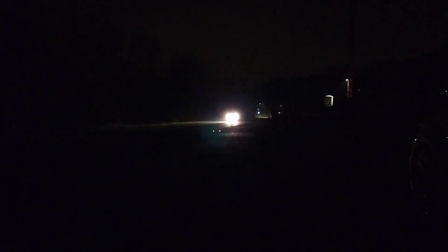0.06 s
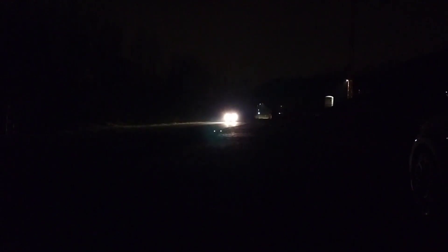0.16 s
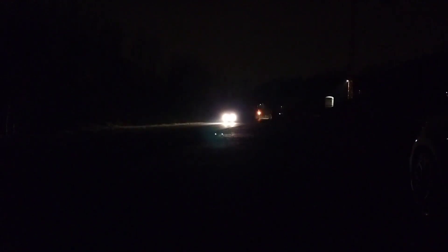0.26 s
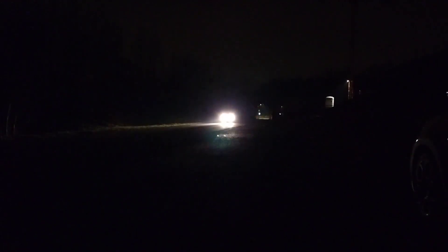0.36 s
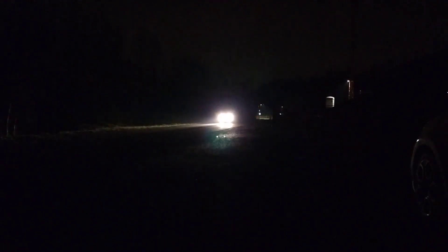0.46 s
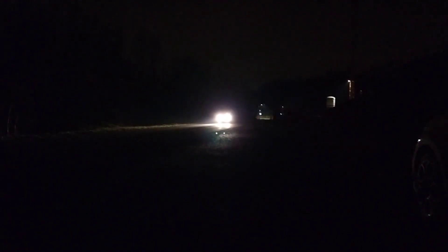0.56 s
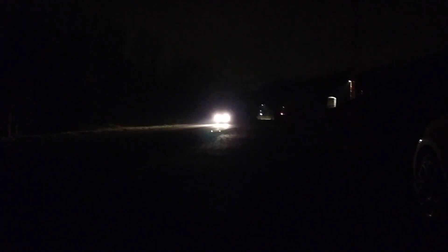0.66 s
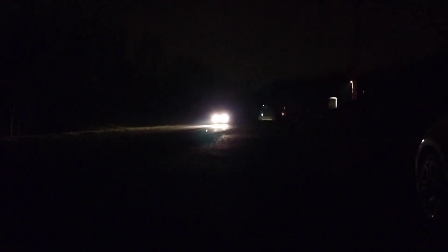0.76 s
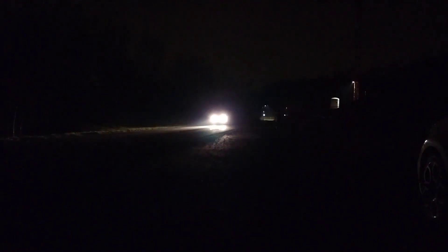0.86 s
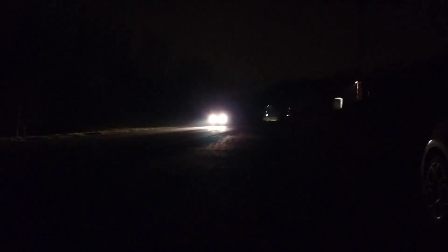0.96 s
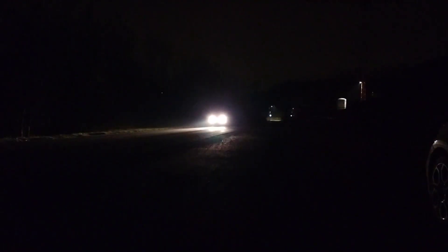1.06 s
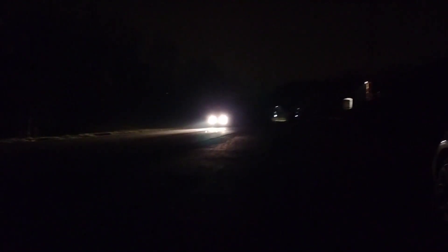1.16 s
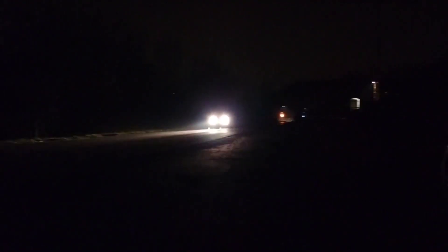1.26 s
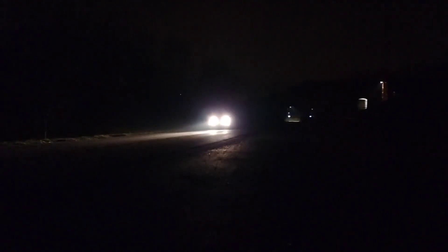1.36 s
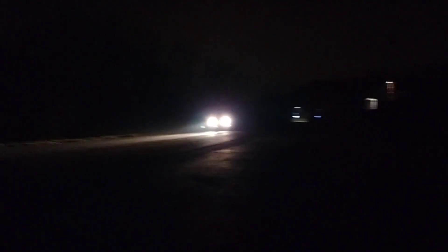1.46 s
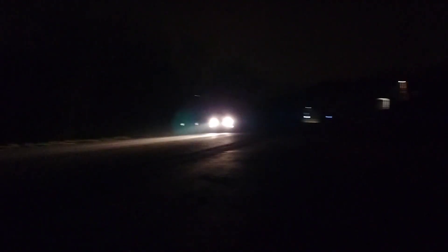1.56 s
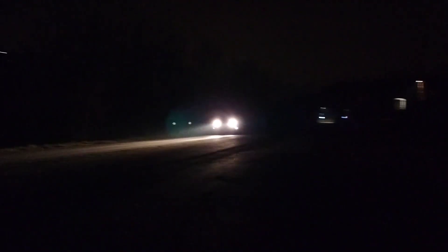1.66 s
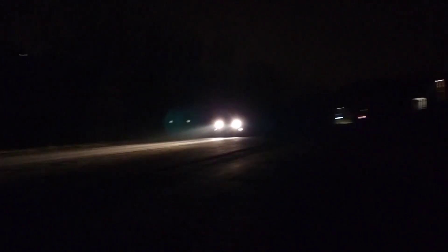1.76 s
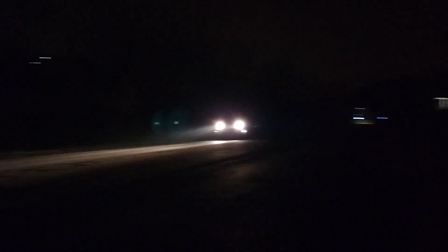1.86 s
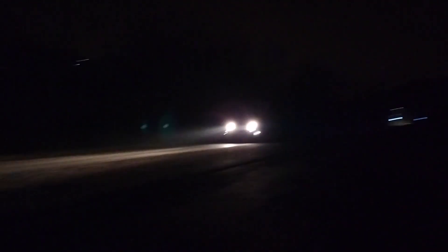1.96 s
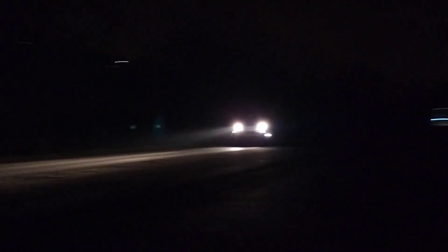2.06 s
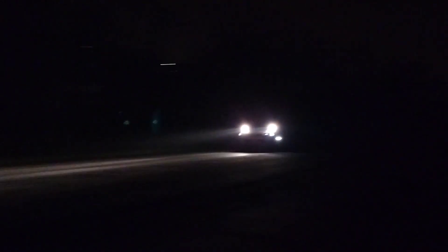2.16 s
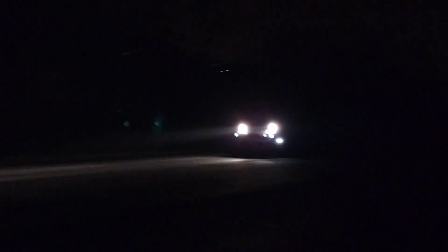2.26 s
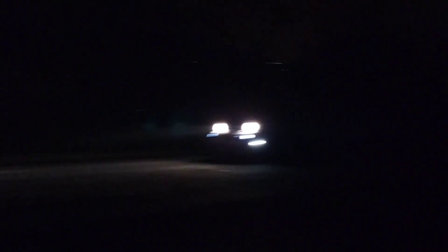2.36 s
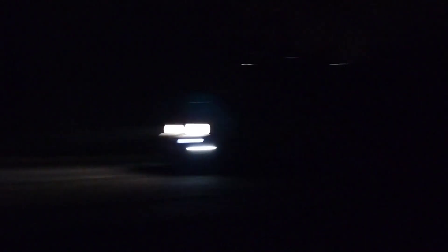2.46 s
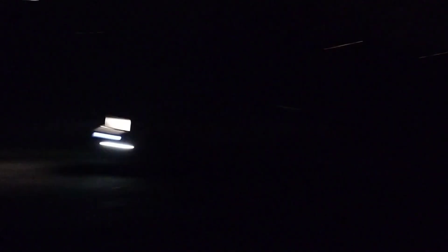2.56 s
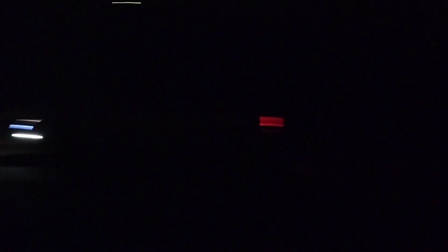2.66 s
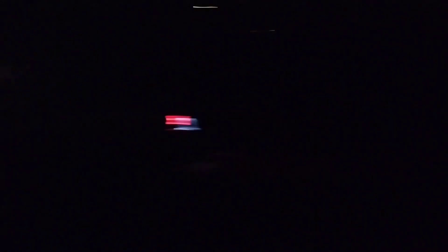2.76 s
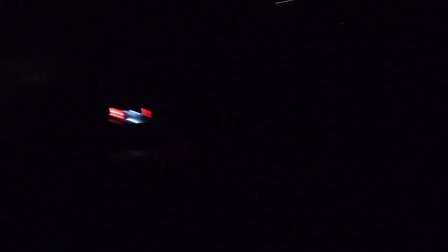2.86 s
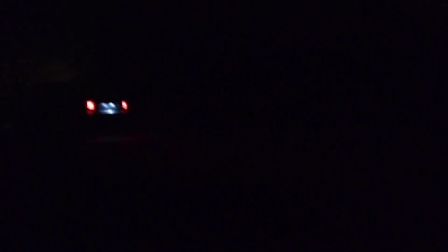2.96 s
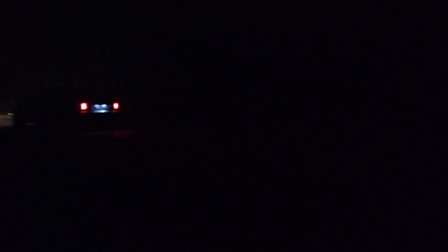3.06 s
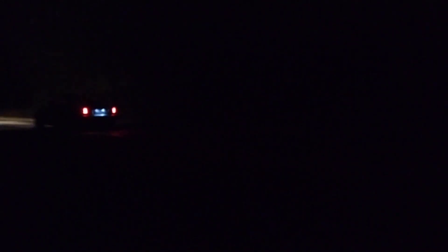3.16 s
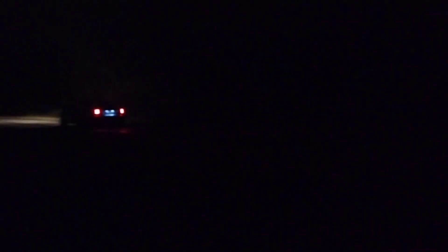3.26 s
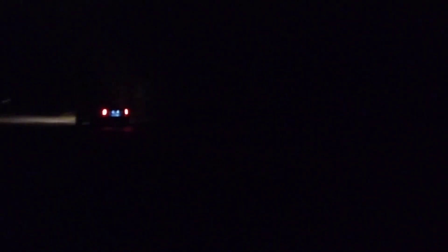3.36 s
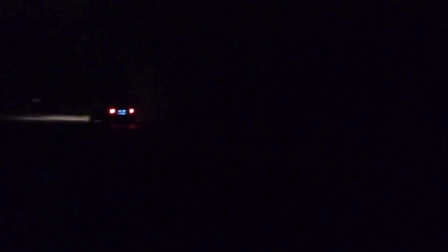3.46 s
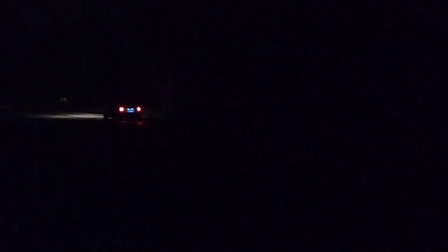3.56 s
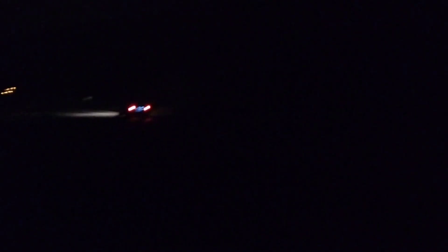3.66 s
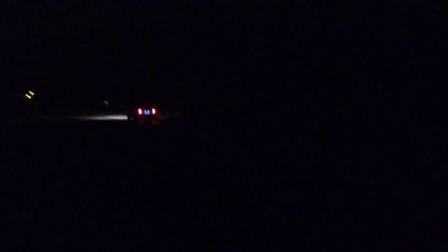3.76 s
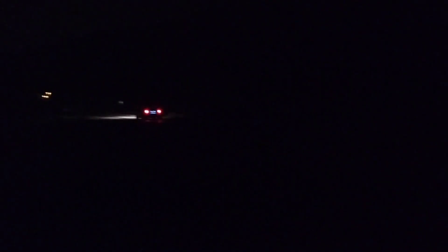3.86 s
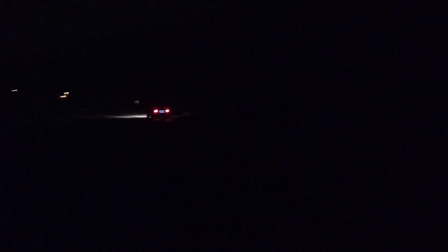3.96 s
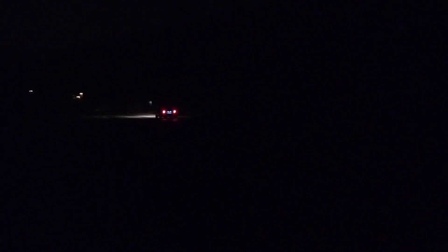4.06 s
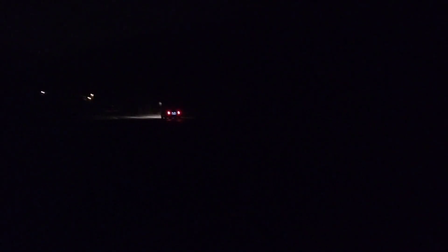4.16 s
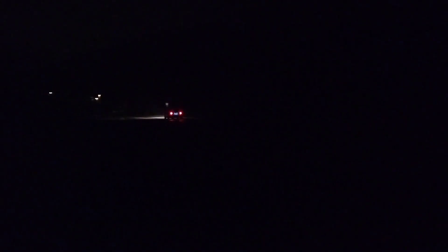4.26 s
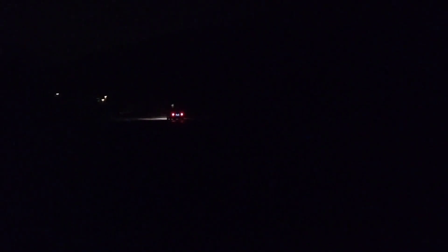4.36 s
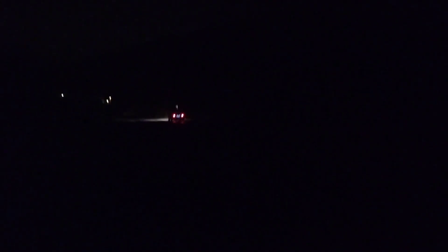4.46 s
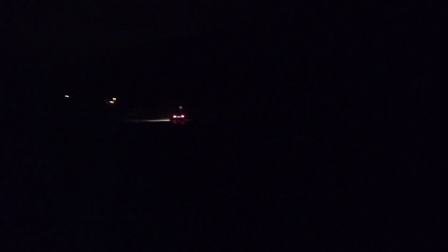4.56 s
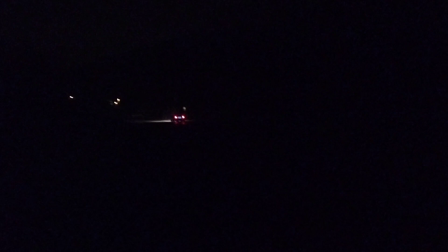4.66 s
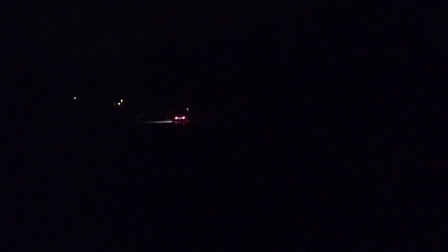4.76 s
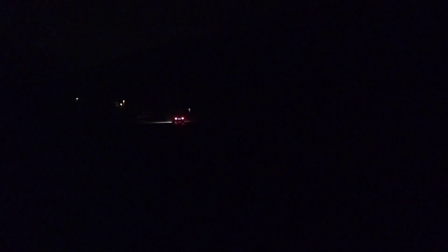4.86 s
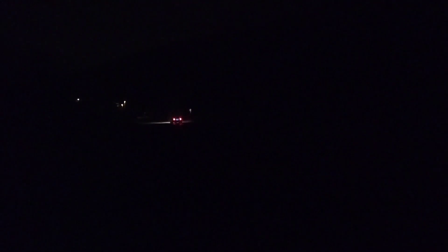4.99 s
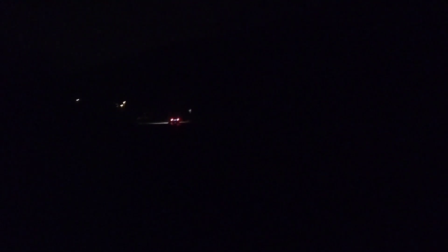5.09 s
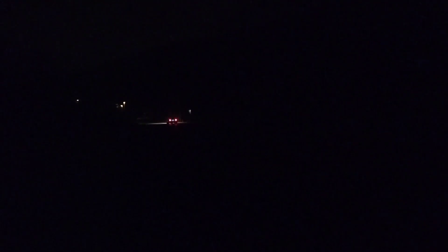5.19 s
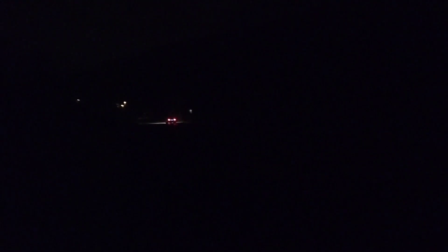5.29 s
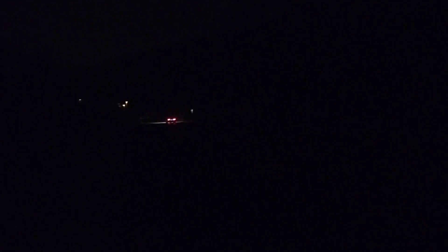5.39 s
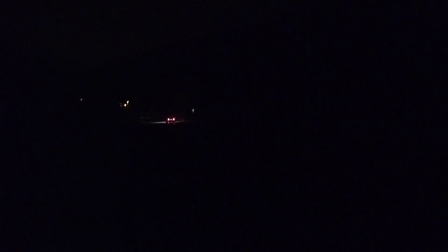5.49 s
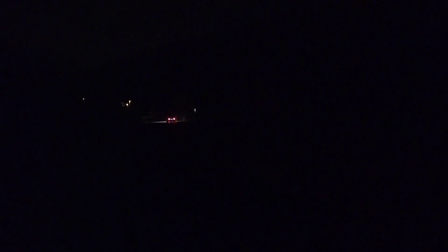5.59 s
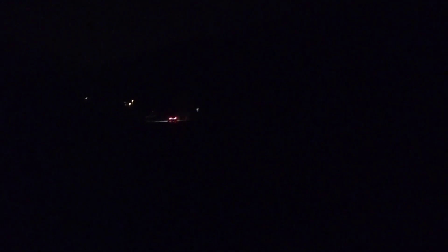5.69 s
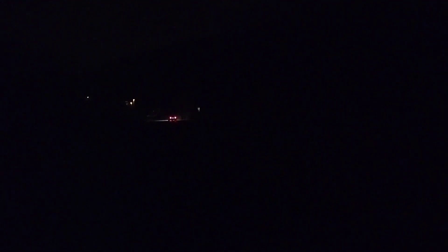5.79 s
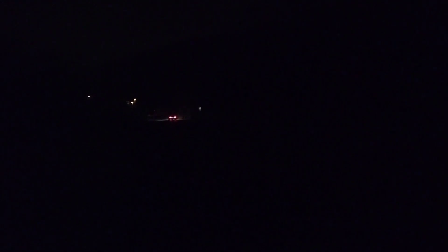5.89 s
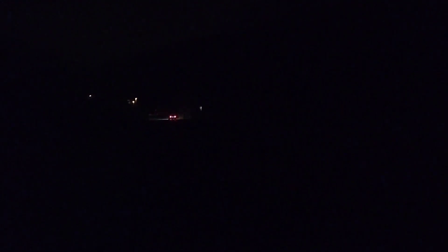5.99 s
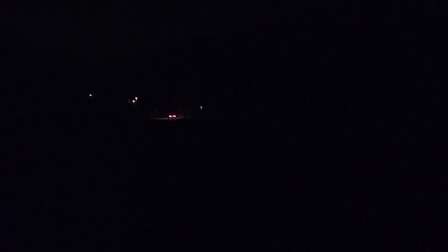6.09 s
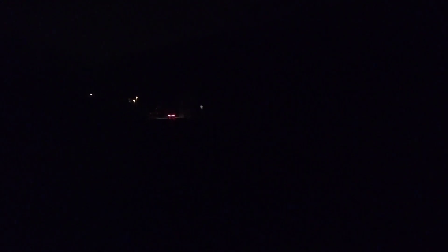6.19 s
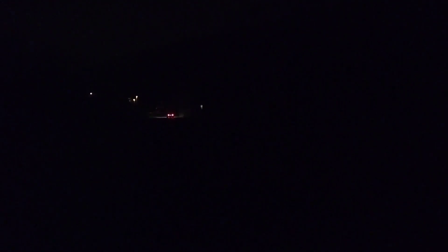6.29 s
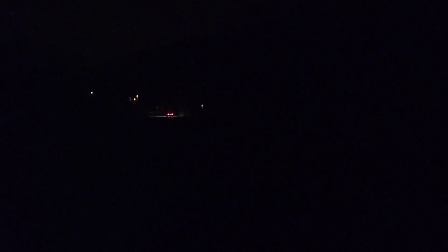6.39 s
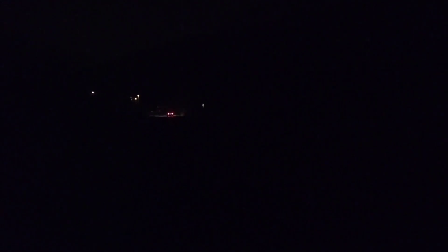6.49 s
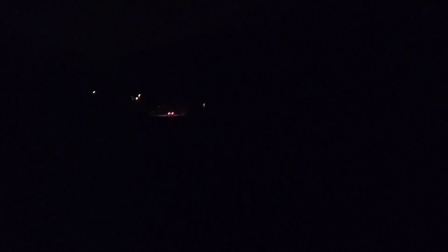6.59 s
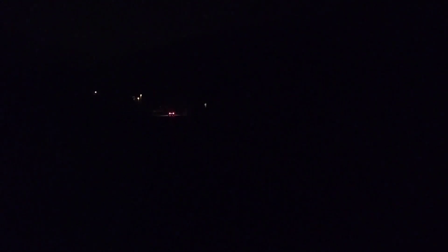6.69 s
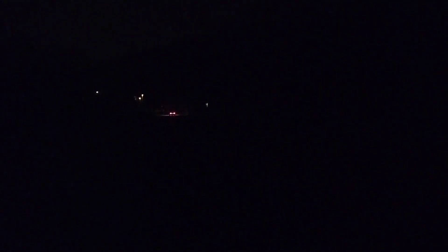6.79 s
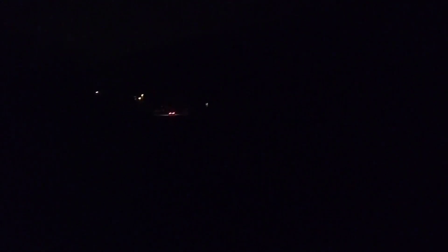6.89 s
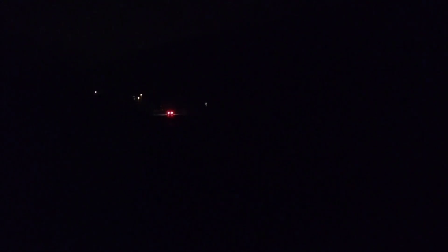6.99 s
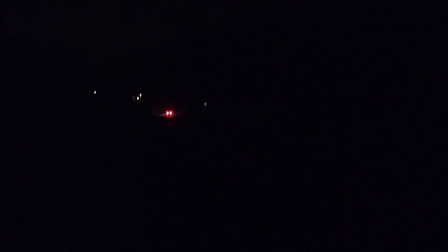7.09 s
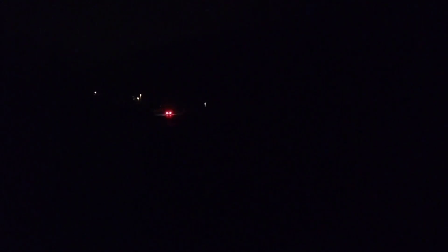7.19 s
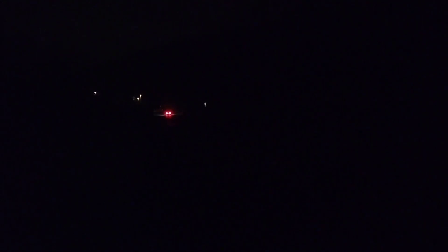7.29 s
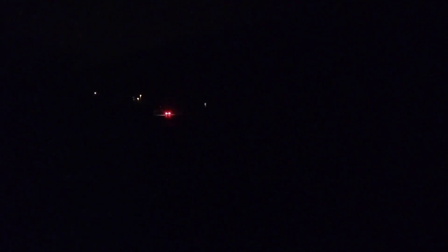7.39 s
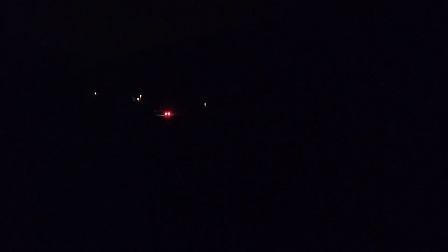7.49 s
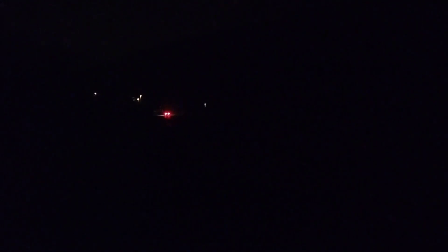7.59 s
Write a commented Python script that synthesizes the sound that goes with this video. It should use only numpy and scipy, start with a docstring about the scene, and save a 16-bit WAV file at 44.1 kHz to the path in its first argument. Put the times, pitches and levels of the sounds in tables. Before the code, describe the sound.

A still night road heard from the verge in the open air. From 0 to 0.5 s a distant four-cylinder engine wavers on and off the throttle, then flares and pulls. Until 2.5 s it approaches as a low, hollow boom around 150-170 Hz, beating slowly against a lower echo from houses behind it, while tyre roar and rushing air swell. At about 2.8 s it passes very close: a loud broadband whoosh, crisp tread hiss, and the pitch slides down. From 2.9 to 3.4 s the tailpipe spits hard, raspy and barking. Revs rise until 3.8 s, the throttle eases, and a tight double pop hits at 4.07 s as the revs fall into the next gear by 4.4 s, with a small shudder. It then pulls away on a steady hollow drone, rasp and bark dulling. Near 6.9 s the driver lifts; a faint rough burble fades out by 7.6 s.

```python
"""A four-cylinder sports car with a loud exhaust speeds up on a night road, passes close by, changes up and drives off.
Coming on, it is a low boom in a rush of tyres and air, beating against its own lower echo from the houses behind it.
Once past, the tailpipe barks and rasps; it pops as the next gear bites and burbles when the driver lifts far away.
Trains of firing pulses through filters make the engine, its echo and its pops, with a sinusoid for most of the boom;
gated noise makes the spray of gas, and coloured noise the road and the night."""
import sys
import numpy as np
from scipy import signal
from scipy.fft import rfft, irfft, next_fast_len
from scipy.io import wavfile
from scipy.ndimage import uniform_filter1d, map_coordinates

SR = 44100
rng = np.random.default_rng(int(sys.argv[2]) if len(sys.argv) > 2 else 0)


def digitize_waveform(pressure):
    """Quantize a signal to 16-bit integers and store it at the path in sys.argv[1].

    Rows of a 2-D input are taken as channels; values are limited to [-1, 1].
    """
    field = np.atleast_2d(pressure).T
    bounded = np.clip(field, -1, 1)
    quanta = np.round(bounded * 32767).astype(np.int16)
    wavfile.write(sys.argv[1], SR, quanta)


N = 336924  # length of the scene in samples


def amp(db):
    """Level law: decibels to amplitude gain."""
    return 10 ** (np.asarray(db) / 20)


def unit(x):
    """Normalisation: x at rms 1."""
    return x / np.sqrt(np.mean(x ** 2) + 1e-20)


def steady(x, size=2200):
    """Envelope flattening: x held at a running rms of 1 over windows of size samples."""
    power = uniform_filter1d(uniform_filter1d(x ** 2, size), size)
    return x / np.sqrt(np.abs(power) + 1e-16)


def curves(rows):
    """Linear interpolation: one value per sample for each column after the time."""
    s, *cols = np.transpose(rows)
    return [np.interp(np.arange(N) / SR, s, c) for c in cols]


def wobble(rate):
    """Slow random modulation: a smooth curve through rate random knots a second."""
    knots = rng.standard_normal(int(N * rate / SR) + 4)
    return map_coordinates(knots, [np.arange(N) * rate / SR])


def coloured(x, points, size=8192):
    """Minimum-phase filtering: x through a causal filter with the gain of the (Hz, dB) points."""
    hz, db = np.transpose(points)
    gain = amp(np.interp(np.log(np.fft.rfftfreq(size, 1 / SR) + 1), np.log(hz), db))
    # folding the cepstrum onto positive time makes the response causal
    cepstrum = irfft(np.log(gain))
    cepstrum[1:size // 2] *= 2
    cepstrum[size // 2 + 1:] = 0
    response = irfft(np.exp(rfft(cepstrum)))
    return signal.oaconvolve(x, response)[:N]


def band(x, lo_hz, hi_hz, order=16):
    """Zero-phase band-pass: the part of x between two edges, steeper with order."""
    m = next_fast_len(N + 8192, True)
    hz = np.fft.rfftfreq(m, 1 / SR) + 1
    spectrum = rfft(x, m) / (1 + (lo_hz / hz) ** order) / (1 + (hz / hi_hz) ** order)
    return irfft(spectrum, m)[:N]


def noise(points):
    """Spectral shaping: random noise of rms 1 with the given colour."""
    return unit(coloured(rng.standard_normal(N), points))


def impulses(at, sizes):
    """Windowed-sinc interpolation: band-limited clicks at fractional sample positions."""
    taps = np.floor(at).astype(int)[:, None] + np.arange(-7, 9)
    away = taps - at[:, None]
    shape = np.sinc(away) * np.cos(np.pi * away / 16) ** 2
    return np.bincount(np.clip(taps, 0, N).ravel(), (sizes[:, None] * shape).ravel(), N + 1)[:N]


PASS_S = 2.83  # moment when the car is abreast (s)
ABREAST_S = .239  # time to travel the closest distance (s)


def since_pass():
    """Kinematics of the pass: seconds since the car was abreast, negative while it comes on."""
    return np.arange(N) / SR - PASS_S


def doppler(mach=.08):
    """Doppler effect: pitch heard over pitch made, for a car at mach times the speed of sound."""
    t = since_pass()
    return 1 / (1 + mach * t / np.hypot(t, ABREAST_S))


def swell_db(lead_s, width_s, spread_db, loss_db_per_s):
    """Spreading of a sound beamed ahead: spread_db lost per tenfold distance, and more to air and ground."""
    t = since_pass() + lead_s
    return -spread_db * np.log10(np.hypot(t, width_s) / width_s) - loss_db_per_s * np.abs(t)


def scattered_share(most=0.69, coming_s=0.93, going_s=2.1):
    """Loss of coherence: the share arriving by detours grows with distance, more slowly while the pipe points
    away."""
    t = since_pass()
    return most * (1 - np.exp(-(t / np.where(t < 0, coming_s, going_s)) ** 2))


# Moves of the pedal, each held until the next; the first row is the starting state. Each row: middle of the
# move in seconds, time taken in seconds, throttle 0-1, roughness of the burn (held to 0-1), weakness of
# every second firing 0-1.
PEDAL_MOVES = [(0, .01, 0.53, 0.04, .05), (0.118, 0.04, .15, 0.16, .05), (.238, 0.028, 0.72, 0.4, .03),
               (.37, 0.019, 0.27, 0.4, 0), (0.407, .02, 0.85, .2, 0), (0.489, 0.044, 0.94, 0.15, 0.08),
               (3.817, .025, 0.51, 0.6, .3), (4.07, .008, 0.98, 0.09, 0), (6.92, 0.086, 0.19, 0.51, 0.3),
               (7.06, 0.06, 0.45, 1.17, 0.4), (7.222, 0.017, .35, 0.25, .75)]


def pedal():
    """Smooth step response: throttle, roughness and weakness per sample."""
    t = np.arange(N) / SR
    state = np.outer(PEDAL_MOVES[0][2:], np.ones(N))
    for before, (s, taken, *after) in zip(PEDAL_MOVES, PEDAL_MOVES[1:]):
        step = (1 + np.tanh(2 * (t - s) / taken)) / 2
        state += np.outer(np.subtract(after, before[2:]), step)
    return np.clip(state, 0, 1)


# Unequal exhaust pipes in firing order. Each row: lateness in firing periods, level in dB.
UNEQUAL_PIPES = [(0.0013, 0.52), (0.033, -0.3), (0.024, -0.1), (0.035, 0.14)]


def firings(turns, rough, weak, jitter, scatter_db=2.0):
    """Near-periodic excitation: unequal pipes make some pulses late, and rough burning scatters them."""
    k = np.arange(1, int(turns[-1]))
    late, db = np.array(UNEQUAL_PIPES)[k % len(UNEQUAL_PIPES)].T
    rough, weak = np.interp(k, turns, rough), np.interp(k, turns, weak)
    moment = k + late + jitter * rough * rng.standard_normal(len(k))
    at = np.interp(moment, turns, np.arange(N))  # sample positions
    sizes = amp(db + scatter_db * rough * rng.standard_normal(len(k))) * (1 - weak * (k % 2))
    return at, sizes


# Colour of the night. Each row: frequency in Hz, relative gain in dB.
NIGHT_COLOUR = [(25, -20.5), (100, 6), (400, -1), (1500, -10), (2600, -22.5), (3800, -18), (5000, -41),
                (8000, -45), (16000, -51)]


def night(level_db=-55.5):
    """Stationary background: faint coloured noise for the still night."""
    return amp(level_db) * noise(NIGHT_COLOUR)


# The houses hear the car going away, so their echo is lower.
# Each row: time in seconds, firing rate heard in Hz, level in dB.
ECHO_COURSE = [(.35, 150.5, -54), (.7, 152, -36.5), (1.2, 152.3, -36), (1.7, 154.7, -32), (2.2, 154.6, -33),
               (2.9, 152.1, -74.5)]
# Colour of the echo. Each row: frequency in Hz, relative gain in dB.
HOUSES_COLOUR = [(100, 0.5), (153, 7.5), (305, 2), (460, -5.5), (615, 0.5), (800, -24), (1100, -17),
                 (2500, -35.5), (5000, -64.5)]


def house_echo(rough, weak):
    """Reflection with its own Doppler shift: the engine note thrown back from behind the oncoming car."""
    hz, db = curves(ECHO_COURSE)
    at, sizes = firings(np.cumsum(hz) / SR, rough, weak, jitter=0.025)
    return amp(db + 1.2 * wobble(7)) * steady(coloured(impulses(at, sizes), HOUSES_COLOUR))


def patchy(x, depth_db=2.3, size=512):
    """Time-varying spectrum: brief swells a few hundred hertz wide, as the surface under the tyres changes."""
    z = signal.stft(x, nperseg=size)[2]
    field = uniform_filter1d(rng.standard_normal(z.shape), size=3, axis=0)
    field = uniform_filter1d(uniform_filter1d(field, size=10, axis=1), size=5, axis=1)
    return unit(signal.istft(z * amp(depth_db * unit(field)), nperseg=size)[1][:N])


# Colours of the tyre roar and of the fine tread hiss. Each row: frequency in Hz, relative gain in dB.
ROAR_COLOUR = [(25, -39.5), (55, -19), (85, -13.5), (200, -4.5), (380, -3), (480, -0.5), (780, -4),
               (1080, -1), (1750, -3), (2600, -10.5), (3050, -19), (3900, -11), (4800, -27.5),
               (5650, -20.5), (6500, -42), (7300, -34), (9600, -50), (12000, -51), (13000, -58),
               (16000, -63.5)]
TREAD_COLOUR = [(1500, -21.5), (3000, -16), (4000, -0.5), (4700, -15), (5800, -6.5), (7200, -16),
                (9700, -28.5), (11000, -33.5), (12000, -24), (13000, -42), (14800, -36.5), (16000, -46)]


def road(throttle, rush_db=-18.5, spray_db=-33, absorption=0.17, behind_db=-3, shut_db=-9.5):
    """Air absorption: tyres and drawn air roar, duller as they fade; tread hiss carries only a few metres."""
    fade_db = swell_db(lead_s=0.63, width_s=0.25, spread_db=17.5, loss_db_per_s=4.0)
    fade_db = fade_db + behind_db * (1 + np.tanh(since_pass() / ABREAST_S)) / 2
    roar = patchy(noise(ROAR_COLOUR))
    low = band(roar, 20, 4600)
    roar = low + amp(absorption * fade_db) * (roar - low)
    hiss_db = spray_db + swell_db(lead_s=0.18, width_s=0.31, spread_db=32, loss_db_per_s=7)
    hiss = amp(hiss_db) * noise(TREAD_COLOUR)
    roar_db = rush_db + fade_db + shut_db * (1 - throttle) + 0.34 * wobble(25)
    return amp(roar_db) * roar + hiss


def roadside(x, t60=0.21, abreast_db=-17, scattered_db=-10.5):
    """Diffuse reverberation: hedges and verges scatter a short dull tail, stronger as the car is farther off."""
    # scattered_db is the limit for a wholly scattered sound
    wet = amp(abreast_db + (scattered_db - abreast_db) * np.sqrt(scattered_share()))
    t = np.arange(SR // 2) / SR
    tail = rng.standard_normal(len(t)) * amp(-60 * t / t60) * (1 - np.exp(-t / 0.0095))
    return band(signal.oaconvolve(wet * x, tail / np.linalg.norm(tail))[:N], 430, 4300, order=2)


# The engine flares, pulls, drops into the next gear, pulls again and coasts.
# Each row: time in seconds, firing rate at the engine in Hz.
REV_COURSE = [(0, 110), (.22, 110.6), (.48, 157.1), (.6, 147.1), (3.8, 171.4), (4.05, 161), (4.44, 128.3),
              (5.25, 131.2), (6.84, 135), (7.0, 131), (7.64, 131.5)]


def firing_rate(clutch_s=4.43, swing_hz=1.8, shudder_hz=6.8, fade_s=.2):
    """Damped torsional oscillation: firings per second, with a drivetrain shudder when the clutch bites."""
    t = np.maximum(np.arange(N) / SR - clutch_s, 0)
    return curves(REV_COURSE)[0] - swing_hz * np.sin(2 * np.pi * shudder_hz * t) * np.exp(-t / fade_s)


def puffs(at, sizes, life, between):
    """Amplitude-gated turbulence: noise bursts out with each pulse and decays by e in life seconds."""
    t = np.arange(SR // 50) / SR
    gate = signal.oaconvolve(impulses(at, sizes), np.exp(-t / life))[:N]
    return unit((gate + between) * rng.standard_normal(N))


# Which colour is heard. Each row: time in seconds, position (0 front, 1 beside, 2 behind, 3 far).
ASPECT_COURSE = [(0, 0), (1.2, 0.5), (2.1, 1.5), (2.65, 0.85), (2.92, 2), (3.8, 2.4), (4.3, 2.5), (4.75, 3),
                 (5.6, 3)]


def heard_aspect():
    """Source directivity: the side from which the car is heard, per sample."""
    return curves(ASPECT_COURSE)[0]


# The exhaust's colour from each side, and off the throttle. Each row: frequency in Hz, relative gain in dB.
FRONT_COLOUR = [(150, 3), (245, 12), (335, 12), (400, -12), (500, 2), (610, 0.5), (680, -2.5), (760, -21),
                (860, -17), (950, -15.5), (1050, 6), (1250, -11), (1400, 2.5), (1750, -3), (2600, -18.5),
                (4000, -56)]
BESIDE_COLOUR = [(150, -16), (260, 0.5), (340, 3.5), (420, -1.5), (515, -2), (690, -1), (780, -16),
                 (860, -5), (950, -2.5), (1040, 2.5), (1130, 1), (1300, -8), (1600, -8), (2100, -20),
                 (2600, -23), (4000, -49.5)]
BEHIND_COLOUR = [(150, -6), (315, 2.5), (390, -6.5), (495, 7.5), (630, -3), (715, -9.5), (950, -1),
                 (1100, -1.5), (1300, -11.5), (1500, -11), (1750, -18), (2050, -25.5), (2300, -22.5),
                 (2700, -44.5), (4000, -68.5)]
FAR_COLOUR = [(120, -12), (245, -9), (305, -16), (365, -6), (430, -8.5), (495, 2), (550, -7.5), (605, -5.5),
              (700, -28.5), (850, -27), (1060, -17.5), (1300, -25.5), (1480, -22.5), (1850, -36),
              (2100, -30.5), (2500, -53), (4000, -56)]
COAST_COLOUR = [(120, -3), (230, -17.5), (305, 7), (366, -6), (425, -6), (490, -11.5), (650, -33),
                (1400, -23), (2000, -29.5), (2600, -48), (4000, -61)]
# Range over which the hollow coasting colour gives way to the full voice. Columns: lower and upper throttle, 0-1.
LOAD_RANGE = (0.35, 0.77)


def pipe_voice(flow, aspect, throttle):
    """Source and filter: the gas flow takes the pipe's colour, turning with the car, hollow off the throttle."""
    pulling = 0
    for k, side in enumerate([FRONT_COLOUR, BESIDE_COLOUR, BEHIND_COLOUR, FAR_COLOUR]):
        pulling = pulling + np.clip(1 - abs(aspect - k), 0, 1) * coloured(flow, side)
    load = np.interp(throttle, LOAD_RANGE, [0, 1])
    return load * pulling + (1 - load) * coloured(flow, COAST_COLOUR)


# The boom at full throttle while the car comes and goes. Each row: time in seconds, level in dB.
BOOM_LEVEL = [(0, -32.5), (.3, -24.5), (1.25, -24.5), (1.9, -20), (2.3, -20.5), (2.49, -15), (2.6, -19.5),
              (2.7, -18), (2.81, -26.5), (3.35, -28.5), (3.65, -24.5), (3.9, -27.5), (4.01, -21),
              (5.05, -27), (5.55, -26), (6.8, -30), (7.0, -34)]
# Over this range the pistons come to keep the boom up without throttle. Columns: lower and upper firing rate in Hz.
PUMP_RANGE = (128, 167)


def boom(turns, rate, throttle, rough, shut_db=-19, rumble_db=-21, lag=0.29, lope=0.02, stumble_db=2):
    """Fundamental of the firing rate: a sinusoid loping once per crank turn, over a little unsteady gas flow."""
    db = curves(BOOM_LEVEL)[0] + shut_db * (1 - throttle) * np.interp(rate, PUMP_RANGE, [1, 0])
    tone = np.sqrt(2) * np.cos(2 * np.pi * (turns + lag)) * (1 + lope * np.cos(np.pi * turns + np.pi / 4))
    rumble = amp(rumble_db) * unit(band(rng.standard_normal(N), 95, 210, order=6))
    return amp(db + stumble_db * rough * wobble(25)) * (tone + rumble)


SPLIT_HZ = 646  # where the pipe's body ends and its bark begins
# The body at full throttle while the car comes and goes. Each row: time in seconds, level in dB.
BODY_LEVEL = [(0, -24.5), (.45, -29.5), (1, -34), (1.5, -28), (1.9, -24), (2.2, -31), (2.62, -21.5),
              (2.92, -19), (3.06, -25.5), (3.6, -15.5), (4.15, -18), (4.7, -16.5), (6.4, -18),
              (6.87, -22.5)]


def body(pipe, throttle, shut_db=-34):
    """Low pipe resonances: the hollow part of the voice, weaker with the throttle shut."""
    db = curves(BODY_LEVEL)[0] + shut_db * (1 - throttle)
    return amp(db + 0.21 * wobble(22)) * steady(band(pipe, 190, SPLIT_HZ))


def drifting_paths(x, drift=0.00018, rate=7, count=6):
    """Multipath interference: x arrives by several detours whose lengths waver in the moving air."""
    n = np.arange(N)
    detours = rng.uniform(.001, .04, count)  # seconds
    return steady(sum(np.interp(n - SR * (d + drift * wobble(rate)), n, x, left=0) for d in detours), size=3000)


# The bark at full throttle while the car comes and goes. Each row: time in seconds, level in dB.
BARK_LEVEL = [(0, -59), (.43, -53.5), (.53, -39), (2.05, -28.5), (2.37, -19), (2.7, -23), (3.1, -19),
              (3.75, -20), (4.25, -24), (4.55, -26.5), (5.7, -34.5), (5.87, -39), (6.02, -34.5),
              (6.15, -38.5), (6.85, -42), (7.64, -56)]


def bark(pipe, throttle, shut_db=-28.5):
    """Coherence falling with distance: the upper voice, whose short waves lose their regularity."""
    db = curves(BARK_LEVEL)[0] + shut_db * (1 - throttle)
    scattered = scattered_share()
    direct = steady(band(pipe, SPLIT_HZ, 2469))
    mixed = np.sqrt(1 - scattered) * direct + np.sqrt(scattered) * drifting_paths(direct)
    return amp(db + 2.2 * scattered * wobble(17)) * mixed


# The pipe spits harder for a moment. Each row: centre in seconds, half-length in seconds, peak level in dB.
HARD_SPITS = [(2.872, 0.066, -26), (2.959, 0.049, -26), (3.052, .035, -26.5), (3.184, .045, -25),
              (3.35, 0.11, -30.5), (4.236, .15, -41), (7.21, 0.12, -59.5)]


def spit_gain():
    """Gaussian envelopes: short surges of the rasp, each a smooth rise and fall."""
    t = np.arange(N) / SR
    return sum(amp(db) * np.exp(-2 * ((t - s) / length) ** 2) for s, length, db in HARD_SPITS)


# The rasp at full throttle, without the spits. Each row: time in seconds, level in dB.
RASP_LEVEL = [(0, -59), (1.5, -44), (2.05, -47), (2.8, -32), (3.1, -31.5), (3.7, -37.5), (4.45, -48),
              (5.3, -50), (6.85, -56.5), (7.64, -67.5)]
# Colours of the rasp close by and far off. Each row: frequency in Hz, relative gain in dB.
NEAR_COLOUR = [(1800, -31), (2700, -14), (3200, -4.5), (3900, 5.5), (4800, -11.5), (5800, -13.5),
               (7200, -13.5), (8200, -39), (10000, -44.5), (12000, -39), (13000, -57.5), (16000, -49)]
FAR_RASP_COLOUR = [(1800, -26), (2600, 0.5), (3200, 8.5), (3800, 4.5), (4300, -4.5), (5000, -43.5),
                   (6000, -25.5), (7000, -28.5), (7800, -52.5), (16000, -66)]


def rasp(at, sizes, aspect, throttle, shut_db=-13, scatter_db=1.0, trim_db=-0.5, surge_db=1.2):
    """Jet noise: steep pulse fronts tear spits of noise off the pipe's mouth; distance dulls and smears them."""
    db = curves(RASP_LEVEL)[0] + shut_db * (1 - throttle)
    distant = np.interp(aspect, [0, 1, 2, 3], [1, 0, 0, 1])
    spits = sizes * amp(scatter_db * rng.standard_normal(len(at)))
    fronts = unit(impulses(at, spits))
    spray = puffs(at, spits, life=.0009, between=.12)
    near = steady(unit(coloured(fronts + spray, NEAR_COLOUR)))
    smeared = 0.18 * fronts + puffs(at, spits, life=0.0014, between=0.55)
    far = steady(unit(coloured(smeared, FAR_RASP_COLOUR)))
    mixed = (1 - distant) * near + amp(surge_db * wobble(14)) * np.sqrt(distant) * far
    return np.hypot(amp(db), spit_gain()) * amp(trim_db) * mixed


# Bangs as the next gear bites. Each row: start in seconds, level in dB.
POP_TIMES = [(4.067, 0), (4.0732, -5.5)]


def pops(crack_db=-52):
    """Impulse response: two hard slugs of gas ring the pipe, each with a faint crack."""
    s, db = np.transpose(POP_TIMES)
    slugs = impulses(s * SR, amp(db))
    bang = band(coloured(slugs, BEHIND_COLOUR), 20, 6000, order=4)
    bang = bang + amp(crack_db) * band(slugs, 2000, 12000, order=6)
    return amp(db.max()) * bang / np.abs(bang).max()


def exhaust(throttle, rough, weak, unrest=0.0013):
    """Pulse excitation of a pipe: the firings give a boom, a hollow body, a bark and a rasp of gas."""
    rate = firing_rate()
    turns = np.cumsum(rate * doppler() * (1 + unrest * wobble(30))) / SR  # firings so far
    aspect = heard_aspect()
    at, sizes = firings(turns, rough, weak, jitter=.022)
    flow = unit(impulses(at, sizes)) + rough * puffs(at, sizes, life=0.0067, between=0.26)
    pipe = pipe_voice(flow, aspect, throttle)
    voice = boom(turns, rate, throttle, rough) + body(pipe, throttle) + bark(pipe, throttle)
    return voice + rasp(at, sizes, aspect, throttle)


def scene():
    """Superposition: the still night, the echo, the road, the roadside and the car."""
    throttle, rough, weak = pedal()
    engine = exhaust(throttle, rough, weak) + pops()
    around = night() + house_echo(rough, weak) + road(throttle) + roadside(engine)
    return (around + engine)[None]


def record(dry, low_cut_hz=45, top_hz=15800):
    """Band limiting: a high-pass thins the deepest bass, and nothing is kept from top_hz up."""
    thin = signal.sosfilt(signal.butter(2, low_cut_hz, "high", fs=SR, output="sos"), dry)
    m = next_fast_len(N + 8192, True)
    return irfft(rfft(thin, m) * (np.fft.rfftfreq(m, 1 / SR) < top_hz), m)[:, :N]


dry = scene()
out = record(dry)
digitize_waveform(out)
```